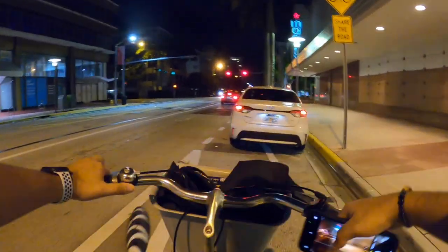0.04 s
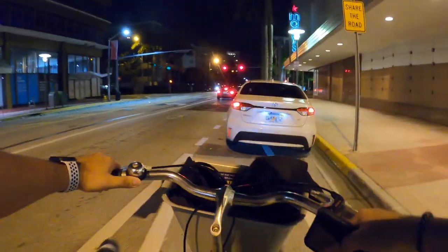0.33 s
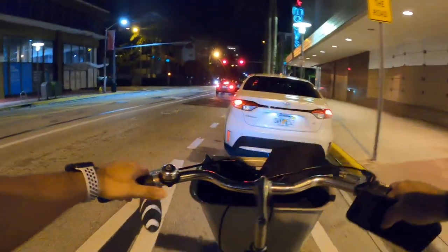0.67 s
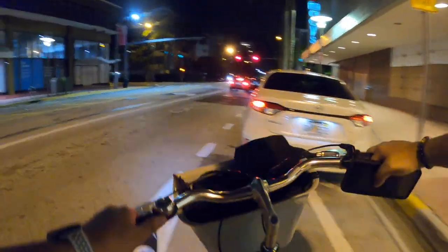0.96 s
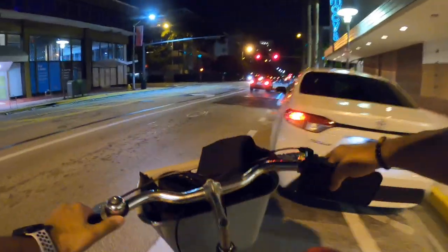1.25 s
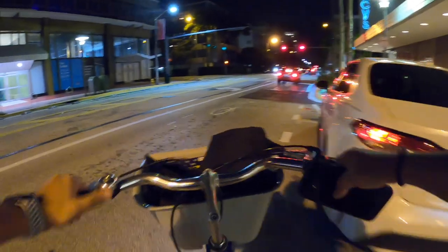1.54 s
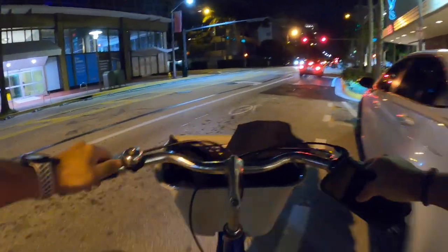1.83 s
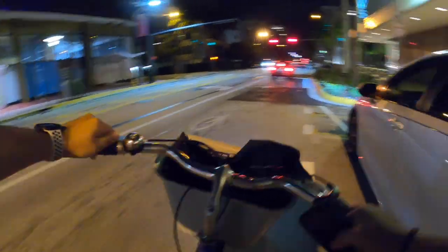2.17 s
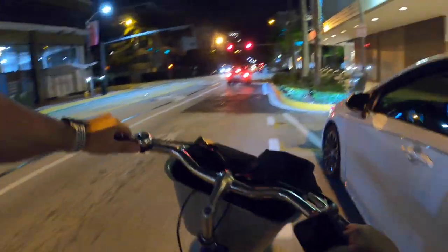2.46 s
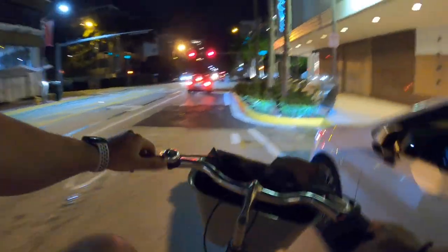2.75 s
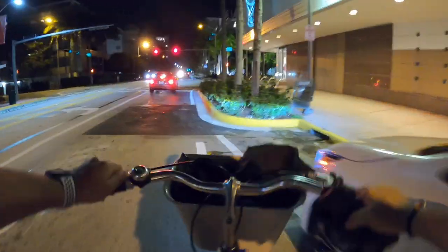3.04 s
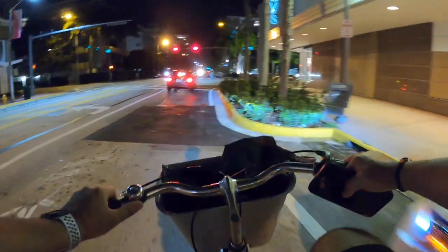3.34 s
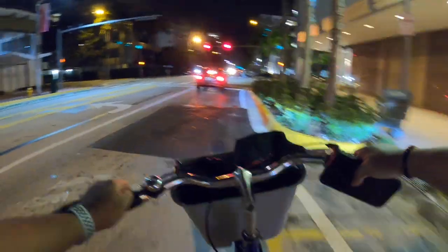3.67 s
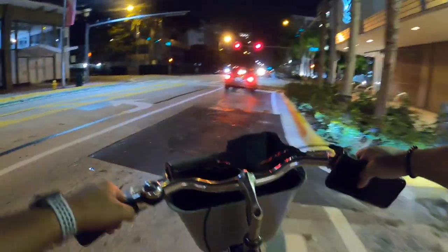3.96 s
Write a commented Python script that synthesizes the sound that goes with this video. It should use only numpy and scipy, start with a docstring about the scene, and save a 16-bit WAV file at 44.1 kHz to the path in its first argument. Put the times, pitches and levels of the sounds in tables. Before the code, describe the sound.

A bicycle bell is rung eight times at an even pace, each bright metallic ring starting with a lever clack. Wind buffets the microphone on the moving bike, over a faint hum of tyres and distant traffic.

```python
"""On the handlebar of a bicycle moving along a street, a thumb-lever bell is rung eight times.
Each push makes the lever and clapper clack, and the blows excite the normal modes of the steel dome.
Its two main partials beat, since each is a pair of modes close in frequency; at times the thumb damps them.
Turbulent wind buffets the microphone over the hum of tyres and distant traffic."""
import sys
import numpy as np
from scipy import signal
from scipy.fft import rfft, irfft
from scipy.io import wavfile

SR = 44100
rng = np.random.default_rng(int(sys.argv[2]) if len(sys.argv) > 2 else 0)


def dump(signal):
    """Clip the signal to [-1, 1] and save it as 16-bit WAV at the path in sys.argv[1]."""
    limited = np.clip(np.atleast_2d(signal).T, -1, 1)
    pcm = np.round(limited * 32767).astype(np.int16)
    wavfile.write(sys.argv[1], SR, pcm)


N = 176400

# Levels in all tables are relative; the functions apply further gains.
# Blows on the dome; twin, octave, hold and fade refer to the low partial (a negative fade grows):
# start_s, low_db, high_db, twin_db, octave_db, rise_s, hold_s, fade_db_per_s
DOME_BLOWS = [(0.513, -24.5, -34, -11, -50, 0.00084, .19, 20),
              (0.551, -29, -24.5, -1.5, -37, .0005, 0.24, 65),
              (0.947, -21.5, -34.5, -36, -62, 0.00035, .19, 44),
              (0.988, -20, -28, -13, -47, 0.00067, .16, 37), (1.329, -27, -35, -3, -40.5, .0005, 0.1, -7.5),
              (1.692, -27.5, -59, -6, -50, 0.00046, .19, 20), (1.724, -22, -29.5, -8, -40, 0.004, 0.2, 70),
              (2.112, -21, -25, -17, -46, 0.00036, 0.063, 8),
              (2.529, -23, -25.5, -35, -49, 0.0041, 0.31, 1), (2.954, -40.5, -53, 4, -50, .0005, .19, 20),
              (3.01, -19, -34, -21, -37, 0.014, 0.23, 98), (3.464, -27, -27, -2, -50, 0.00045, .19, 20),
              (3.491, -24.5, -25, -12, -49.5, 0.0027, 0.057, 34.5)]
# Touches of the thumb, damping the dome until the next blow: start_s, gain_db
THUMB_TOUCHES = [(.85, -18), (1.607, -23), (2.862, -30)]
# Impacts of lever and clapper: start_s, tick_db, housing_db
LEVER_IMPACTS = [(0.5103, -14.5, -37), (0.5509, -14.5, -21), (0.562, -20, -52), (0.5886, -18, -44),
                 (0.627, -35, -32.5), (0.945, -13.5, -15), (0.9887, -19, -21), (1.0194, -30, -48),
                 (1.0304, -16, -12), (1.0774, -76, -29), (1.119, -78, -33), (1.3306, -16.5, -18),
                 (1.3555, -13.5, -12), (1.377, -18, -16.5), (1.6899, -10.5, -25), (1.711, -17, -19),
                 (1.725, -13, -16), (1.9045, -25.5, -25), (1.9276, -32, -25), (2.094, -36, -29),
                 (2.1098, -9.5, -18.5), (2.1227, -32, -22), (2.1292, -16, -22), (2.528, -12, -23),
                 (2.5421, -12, -43), (2.551, -17, -22), (2.557, -19, -20), (2.5914, -69, -34),
                 (2.9524, -11, -29), (2.983, -19.5, -26), (2.9945, -13.5, -14), (3.0024, -19, -10),
                 (3.0064, -13.5, -33), (3.465, -33, -33), (3.461, -15, -22), (3.4776, -15.5, -17),
                 (3.4874, -14, -12), (3.4924, -26, -25)]
# Heavily damped modes of the housing: pitch_hz, level_db, t60_s
HOUSING_MODES = [(1190, -14, 0.06), (1500, -10.5, 0.057), (1752, -2, 0.051), (1900, 8, .04),
                 (2144, -1.5, 0.051), (2176, -6, 0.06), (2790, -11, 0.028), (3010, 1.5, 0.015)]
# Spectrum of metal striking metal: frequency_hz, density_db
TICK_SPECTRUM = [(400, -12.5), (1200, -7), (2200, 4), (3200, 7), (4300, -13), (5200, -3.5), (5900, -0.5),
                 (6800, -8.5), (8500, -1.5), (10300, -6.5), (11200, -21), (12500, -31.5), (13900, -21.5),
                 (14800, -30.5), (15500, -49)]
# Envelope of the wind's low rumble: time_s, level_db
RUMBLE_ENVELOPE = [(0, -24), (.17, -19), (.45, -23.5), (.6, -22.5), (.85, -22.5), (1.03, -17), (1.11, -30),
                   (1.24, -32.5), (1.4, -27.5), (1.53, -33), (1.64, -22), (1.78, -28.5), (2.05, -28.5),
                   (2.3, -29), (2.53, -18), (2.6, -30), (2.7, -25.5), (2.8, -34.5), (2.92, -20),
                   (3.04, -18), (3.22, -26.5), (3.4, -21), (3.5, -23), (3.7, -19.5), (3.88, -20.5),
                   (4, -29)]
# Spectrum of the rumble: frequency_hz, density_db
RUMBLE_SPECTRUM = [(15, -10), (30, 1.5), (55, -1), (85, -2), (120, -3), (170, -9), (260, -21.5), (500, -40),
                   (1500, -92.5)]
# Envelope of the wind's higher rush: time_s, level_db
RUSH_ENVELOPE = [(0, -37), (.15, -29.5), (.25, -35), (.42, -30), (.55, -39), (.7, -42.5), (.95, -43),
                 (1.1, -51.5), (1.4, -46), (1.65, -36), (1.78, -43.5), (2.05, -34.5), (2.2, -44.5),
                 (2.38, -33.5), (2.5, -30), (2.62, -43), (2.85, -39.5), (2.98, -44.5), (3.1, -45.5),
                 (3.37, -33.5), (3.52, -46.5), (3.65, -35.5), (3.86, -37), (4, -40)]
# Spectrum of the rush: frequency_hz, density_db
RUSH_SPECTRUM = [(40, -21.5), (120, -8.5), (250, 2.5), (400, -3), (650, -10.5), (1000, -20.5),
                 (1600, -38.5), (3000, -39.5), (8000, -94.5)]
# Single buffets of air, as Gaussian pulses: peak_s, width_s, level_db
AIR_BUFFETS = [(.056, .008, -19), (.165, .015, -28), (.208, .008, -25), (.315, .013, -23),
               (.367, .012, -20), (.605, .012, -34), (1.665, .02, -35), (1.852, .008, -33),
               (2.415, .012, -30), (2.458, .016, -24), (2.92, .006, -18), (2.945, .007, -25),
               (3.035, .007, -27), (3.315, .014, -29), (3.408, .008, -21), (3.66, .005, -27),
               (3.702, .004, -19), (3.768, .005, -17), (3.802, .006, -17), (3.852, .012, -22),
               (3.882, .009, -21), (3.93, .006, -31)]
# Spectrum of a buffet: frequency_hz, density_db
BUFFET_SPECTRUM = [(40, -9.5), (130, 2.5), (280, 1.5), (450, -4), (700, -10), (1000, -18.5), (1600, -30.5),
                   (3000, -47.5), (8000, -77)]
# Spectrum of tyres and traffic: frequency_hz, density_db
STREET_SPECTRUM = [(60, 2.5), (300, -1), (600, -7), (1100, -8.5), (2000, -12), (3500, -20.5), (6000, -27),
                   (9000, -38.5), (11500, -48), (15000, -59)]

LOW_HZ, LOW_TWIN_OFFSET_HZ = 3019, -20.3
HIGH_HZ, HIGH_TWIN_OFFSET_HZ, HIGH_TWIN_DB = 7620, 15, -21.5
HIGH_HOLD_S, HIGH_FADE_DB_PER_S, OCTAVE_FADE_RATIO = .11, 86.5, .77
STOP_S, THUMB_DAMPING_S = .001, .017
HOUSING_GAIN_DB, KNOCK_RISE_S, MODE_DETUNE_RATIO, MODE_SCATTER_DB = -21, .0015, .04, 3.2
TICK_GAIN_DB, TICK_RISE_S, TICK_DECAY_S = 1.5, .0011, .00097
TAIL_GAIN_DB, TAIL_DECAY_S, LEAD_IN_GAIN_DB, LEAD_IN_RISE_S = -12, .0065, -30, .008
RUMBLE_GAIN_DB, RUSH_GAIN_DB, BUFFET_GAIN_DB = 2, 2.5, 3.5
STREET_DB, STREET_SWELL_DB = -40.5, 1.2


def bell_dome():
    """Free vibration: each blow restarts the dome's modes, which ring until damped or struck again."""
    low, high, octave = np.zeros((3, N), complex)
    ends = [blow[0] for blow in DOME_BLOWS[1:]] + [N / SR]
    for blow, end_s in zip(DOME_BLOWS, ends):
        start_s, low_db, high_db, twin_db, octave_db, rise_s, hold_s, fade_db_per_s = blow
        t = np.arange(0, end_s - start_s + STOP_S, 1 / SR)
        attack = 1 - np.exp(-t / rise_s)
        release = np.clip((t[-1] - t) / STOP_S, 0, 1)
        gate = attack * release * thumb_damping(t, start_s, end_s)
        low_loss_db = fade_db_per_s * np.maximum(t - hold_s, 0)
        high_loss_db = HIGH_FADE_DB_PER_S * np.maximum(t - HIGH_HOLD_S, 0)
        low_pair = mode_pair(t, LOW_HZ, LOW_TWIN_OFFSET_HZ, twin_db)
        high_pair = mode_pair(t, HIGH_HZ, HIGH_TWIN_OFFSET_HZ, HIGH_TWIN_DB)
        octave_tone = amp(octave_db) * np.exp(2j * np.pi * 2 * LOW_HZ * t)
        add(low, start_s, gate * amp(low_db - low_loss_db) * low_pair)
        add(high, start_s, gate * amp(high_db - high_loss_db) * high_pair)
        add(octave, start_s, gate * amp(low_db - OCTAVE_FADE_RATIO * low_loss_db) * octave_tone)
    low *= sway(depth_db=2.63, rate_hz=16, phase_rad=.31)
    low *= sway(depth_db=.99, rate_hz=57, phase_rad=.03)
    high *= sway(depth_db=2.35, rate_hz=16, phase_rad=.99)
    high *= sway(depth_db=2.5, rate_hz=76, phase_rad=.13)
    return np.sqrt(2) * (low + high + octave).real


def mode_pair(t, pitch_hz, offset_hz, twin_db):
    """Superposition: a mode and its nearby twin beat at their difference frequency."""
    twin = amp(twin_db) * np.exp(2j * np.pi * (pitch_hz + offset_hz) * t)
    return np.exp(2j * np.pi * pitch_hz * t) + twin


def thumb_damping(t, start_s, end_s):
    """Contact damping: a touch between two blows absorbs most of the remaining vibration."""
    return amp(sum(gain_db * np.clip((start_s + t - touch_s) / THUMB_DAMPING_S, 0, 1)
                   for touch_s, gain_db in THUMB_TOUCHES if start_s < touch_s < end_s))


def sway(depth_db, rate_hz, phase_rad):
    """Amplitude and phase modulation: a partial wavers as the handlebar moves before the microphone."""
    return amp(depth_db * wander(rate_hz)) * np.exp(1j * phase_rad * wander(rate_hz))


def lever_clacks():
    """Impact noise: a tick of metal and a knock of the housing; a faint hiss swells into each tick."""
    knocks, envelope = np.zeros((2, N))
    t = np.arange(SR // 10) / SR
    decay = np.exp(-t / TICK_DECAY_S) + amp(TAIL_GAIN_DB) * np.exp(-t / TAIL_DECAY_S)
    tick = np.minimum(t / TICK_RISE_S, 1) * decay
    lead_in = np.exp(-t[::-1] / LEAD_IN_RISE_S)
    for start_s, tick_db, housing_db in LEVER_IMPACTS:
        add(knocks, start_s, amp(housing_db + HOUSING_GAIN_DB) * housing_knock(t))
        add(envelope, start_s, amp(tick_db + TICK_GAIN_DB) * tick)
        add(envelope, start_s - t[-1], amp(tick_db + LEAD_IN_GAIN_DB) * lead_in)
    return knocks + envelope * noise(TICK_SPECTRUM) * flutter(depth_db=1, rate_hz=900)


def housing_knock(t):
    """Impulse response: a sum of damped modes, varying in pitch, level and sign from knock to knock."""
    pitch_hz, level_db, t60_s = np.transpose(HOUSING_MODES)[:, :, None]
    detune, strength = rng.standard_normal((2, len(HOUSING_MODES), 1))
    sign = rng.choice([-1, 1], (len(HOUSING_MODES), 1))
    decays = amp(level_db + MODE_SCATTER_DB * strength - 60 * t / t60_s)
    modes = sign * np.sin(2 * np.pi * pitch_hz * (1 + MODE_DETUNE_RATIO * detune) * t)
    attack = 1 - np.exp(-t / KNOCK_RISE_S)
    return unit(attack * (decays * modes).sum(0))


def wind():
    """Turbulence: pressure fluctuations at the microphone make a rumble, a rush and short buffets."""
    t = np.arange(N) / SR
    rumble = noise(RUMBLE_SPECTRUM) * flutter(depth_db=1.8, rate_hz=36)
    rumble *= amp(curve(RUMBLE_ENVELOPE) + RUMBLE_GAIN_DB)
    rush = noise(RUSH_SPECTRUM) * flutter(depth_db=2.6, rate_hz=39)
    rush *= amp(curve(RUSH_ENVELOPE) + RUSH_GAIN_DB)
    pulses = sum(amp(level_db + BUFFET_GAIN_DB) * np.exp(-.5 * ((t - peak_s) / width_s) ** 2)
                 for peak_s, width_s, level_db in AIR_BUFFETS)
    return rumble + rush + pulses * noise(BUFFET_SPECTRUM)


def street():
    """Incoherent sources: tyres and distant traffic merge into one gently swelling noise."""
    return amp(STREET_DB + STREET_SWELL_DB * wander(rate_hz=5)) * noise(STREET_SPECTRUM)


def noise(spectrum):
    """Spectral shaping: white noise takes on the given spectrum, at rms 1."""
    frequency_hz, density_db = np.transpose(spectrum)
    bins_hz = np.fft.rfftfreq(N, 1 / SR)
    gain = amp(np.interp(np.log(bins_hz + 1), np.log(frequency_hz), density_db))
    return unit(irfft(rfft(rng.standard_normal(N)) * gain, N))


def wander(rate_hz):
    """Low-pass filtering: noise becomes smooth random motion of zero mean and rms 1."""
    bins_hz = np.fft.rfftfreq(N, 1 / SR)
    gain = np.exp(-(bins_hz / rate_hz) ** 2) * (bins_hz > 0)
    return unit(irfft(rfft(rng.standard_normal(N)) * gain, N))


def flutter(depth_db, rate_hz):
    """Random amplitude modulation: a fluctuating gain of rms 1."""
    return unit(amp(depth_db * wander(rate_hz)))


def amp(db):
    """Amplitude ratio of a level in decibels."""
    return 10 ** (np.asarray(db) / 20)


def unit(x):
    """Normalisation to rms 1."""
    return x / np.sqrt(np.mean(x ** 2) + 1e-20)


def curve(points):
    """Linear interpolation between rows of time_s, value."""
    return np.interp(np.arange(N) / SR, *np.transpose(points))


def add(mix, start_s, sound):
    """Superposition of a sound on the mix from a given time."""
    part = mix[max(round(start_s * SR), 0):][:len(sound)]
    part += sound[:len(part)]


def scene():
    """Superposition: the pressures of bell, wind and street add at one point."""
    return (bell_dome() + lever_clacks() + wind() + street())[None]


def record(dry):
    """Band limiting: filters remove pressure drift below 10 Hz and treble above 15.7 kHz."""
    high_pass = signal.butter(1, 10, "high", fs=SR, output="sos")
    low_pass = signal.firwin(511, 15700, window=("kaiser", 9), fs=SR)
    return signal.oaconvolve(signal.sosfilt(high_pass, dry), low_pass[None], "same")


dry = scene()
out = record(dry)
dump(out)
```